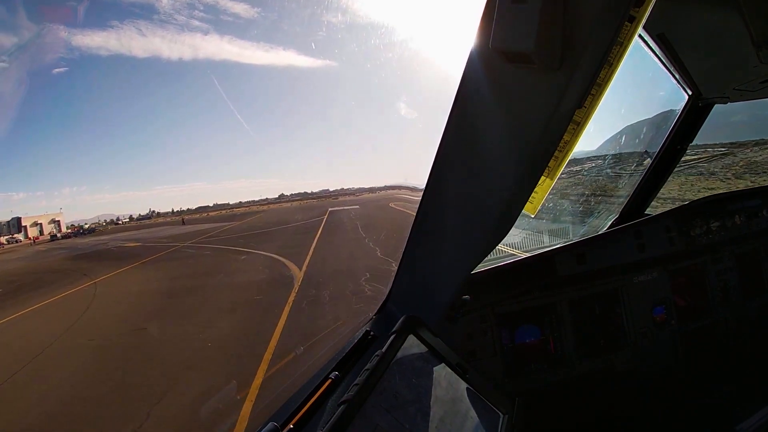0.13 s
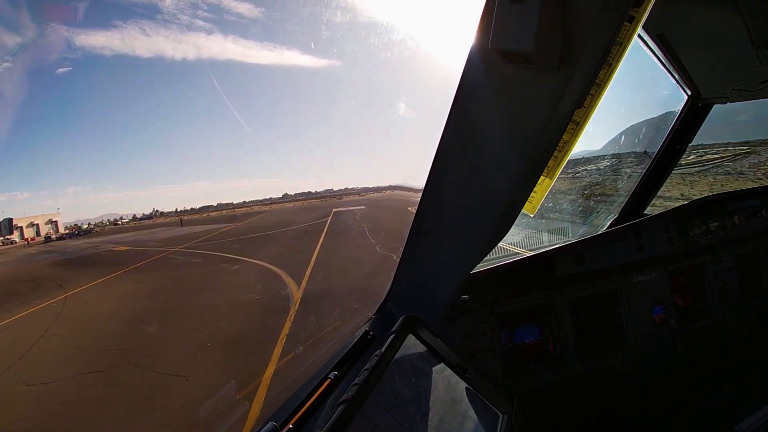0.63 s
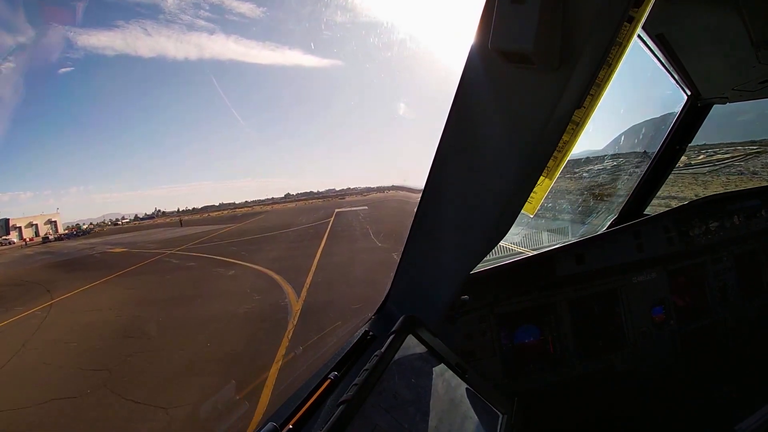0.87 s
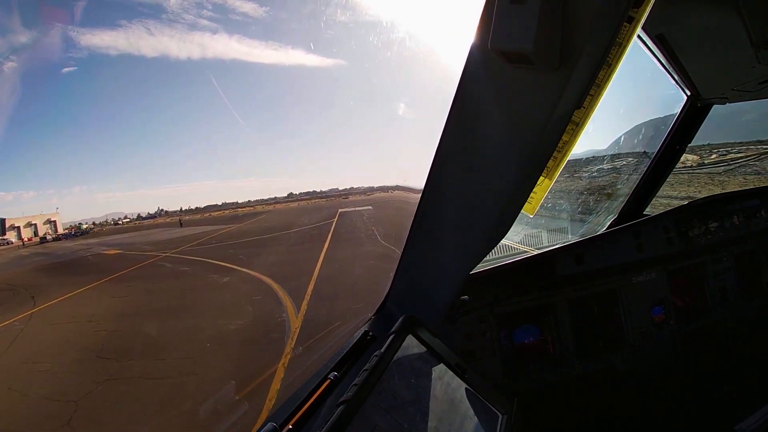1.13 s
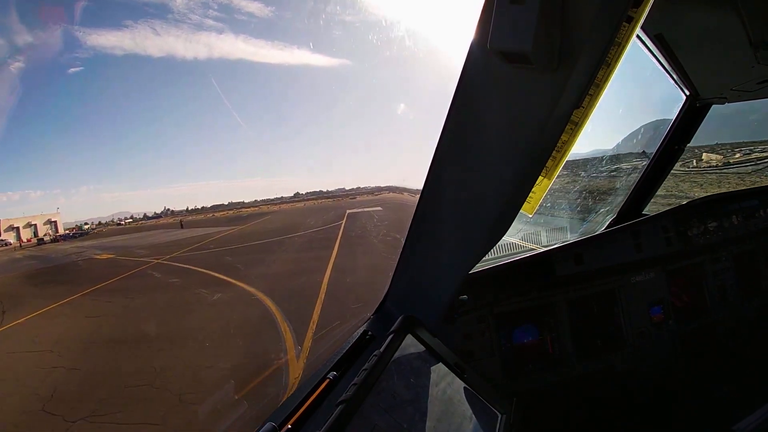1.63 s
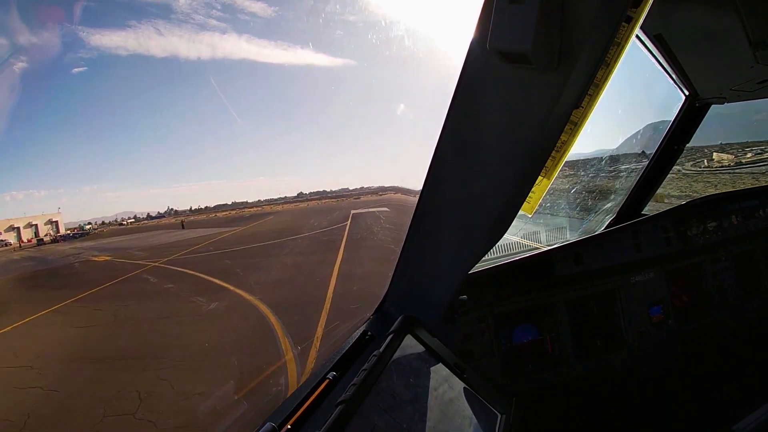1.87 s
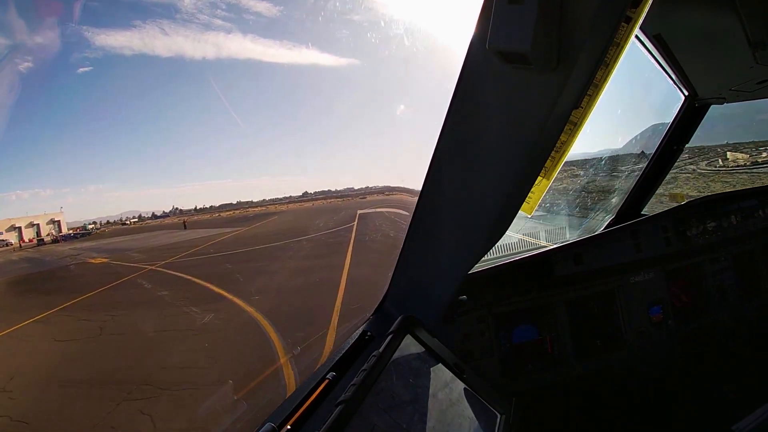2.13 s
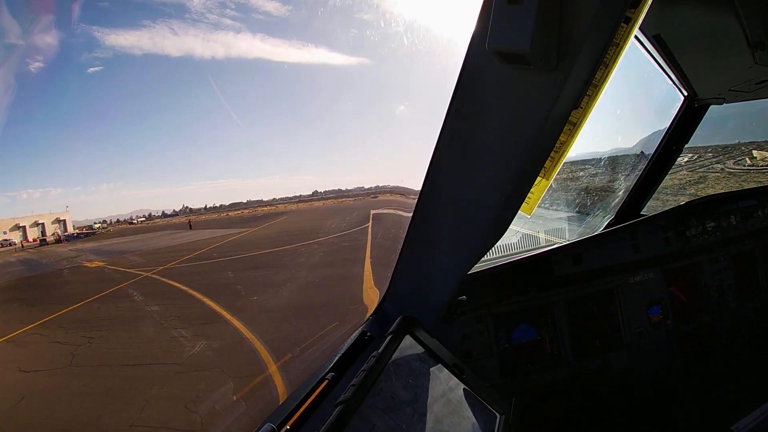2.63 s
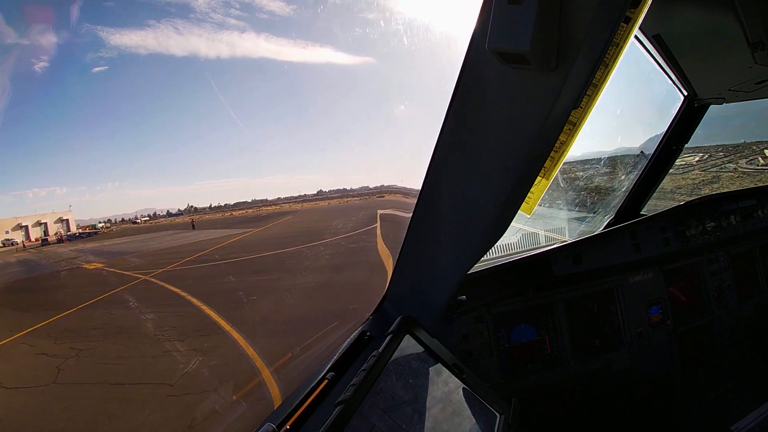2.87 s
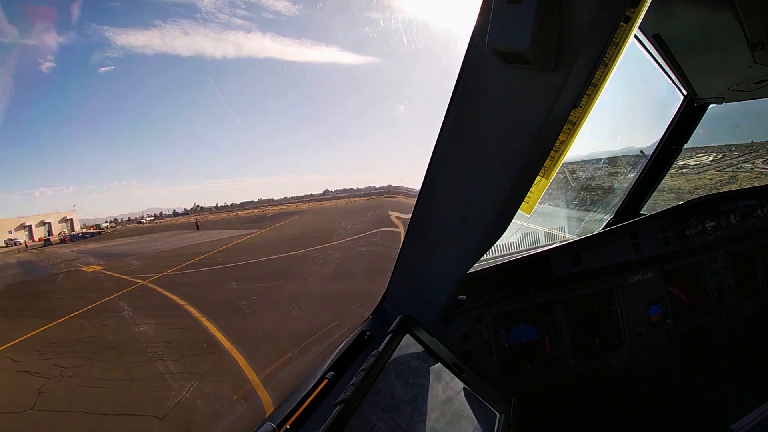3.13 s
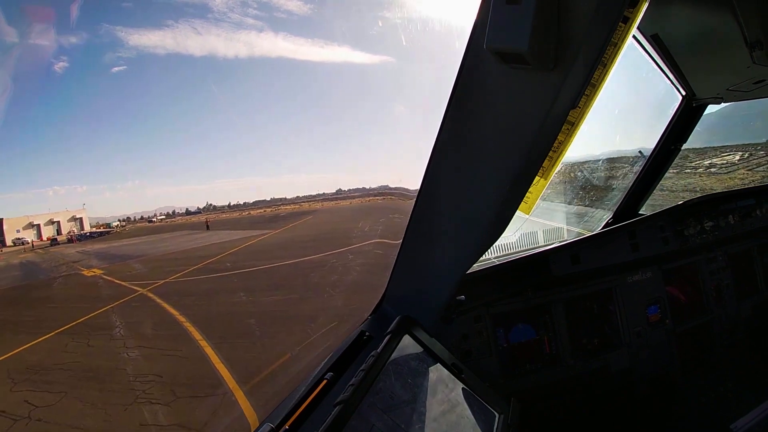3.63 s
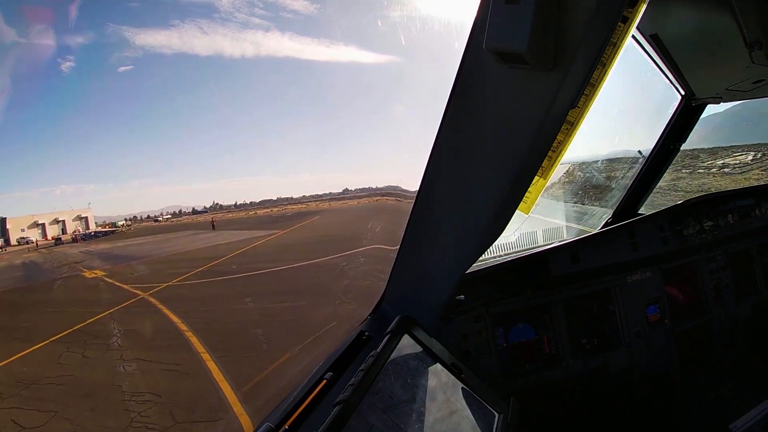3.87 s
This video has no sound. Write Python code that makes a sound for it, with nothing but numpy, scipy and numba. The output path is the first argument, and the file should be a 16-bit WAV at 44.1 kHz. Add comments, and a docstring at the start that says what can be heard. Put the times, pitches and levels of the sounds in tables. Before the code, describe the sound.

Deep wavering airframe rumble of a taxiing jet heard in its cockpit, with steady vent hiss

```python
"""Airframe boom fills a taxiing jet cockpit: engines and wheels shake it, heard as wavering sines over low noise.
Conditioned air rushes from the vents, as shaped noise through drifting cabin and duct resonances.
Loose trim rattles on bumps and small plastic parts tick, as short bursts of gritty noise.
Cooling fans and a turbine whine faintly, as sines with unsteady pitch and level. A limiter rides the bass peaks."""
import sys
import numpy as np
from scipy import signal
from scipy.fft import rfft, irfft, next_fast_len
from scipy.io import wavfile
from scipy.ndimage import uniform_filter1d, minimum_filter1d, map_coordinates
from numba import njit

SR = 44100
rng = np.random.default_rng(int(sys.argv[2]) if len(sys.argv) > 2 else 0)


def voltage_ratio(decibels):
    """Convert decibels (scalar or array-like) to amplitude ratios, 20 dB per decade."""
    exponent = np.asarray(decibels, float) / 20
    return 10 ** exponent


def bounce(signal):
    """Save signal as a 16-bit WAV file at the path given by the first command-line argument."""
    frames = np.transpose(np.atleast_2d(signal))
    limited = np.clip(frames, -1, 1)
    pcm = np.round(limited * 32767).astype(np.int16)
    wavfile.write(sys.argv[1], SR, pcm)


N = 176400  # samples

# Swelling of the five lowest airframe modes: [t/s, then level/dB of each mode]
MODE_LEVELS = [(0.05, -24, -23, -16, -28.5, -30), (0.21, -20, -17, -26, -30, -34),
               (0.34, -12, -12, -30.5, -40, -38), (0.43, -21, -17.5, -20, -27, -29.5),
               (0.75, -19.5, -18.5, -23, -26.5, -26.5), (0.97, -19, -22, -32, -27, -28.5),
               (1.18, -14, -25, -15.5, -24.5, -33), (1.28, -16, -17.5, -31, -31.5, -33.5),
               (1.85, -31, -22, -17.5, -49, -27), (1.96, -19.5, -31, -33, -38, -30.5),
               (2.01, -29, -14, -28, -28.5, -33), (2.15, -20.5, -32, -36.5, -39.5, -26.5),
               (2.52, -21, -33, -29, -38, -29.5), (2.63, -26, -33, -31, -30, -22.5),
               (2.69, -20, -21, -23, -51, -30), (3.25, -22, -31, -24.5, -26.5, -32.5),
               (3.31, -27, -28.5, -28, -27, -29.5), (3.62, -17.5, -21, -15.5, -31, -32),
               (3.68, -34, -19.5, -23.5, -39, -31.5), (4.0, -23, -24, -31.5, -27.5, -24.5)]
# The same modes: [f/Hz, pitch wander/Hz, wander rate/knots per s, churning share/0-1]
MODES = [(23.9, 1.144, 5, 0.15), (47.1, 4.55, 12, 0.45), (77, 5.91, 14, 0.41), (127.2, 4.8, 18, 0.44),
         (176.8, 8.98, 26, 0.35)]
# Rolling and engine rumble, relative spectrum: [f/Hz, level/dB]
RUMBLE_SPECTRUM = [(2.4, -15), (4.0, -16.5), (27, -4.5), (75, -4), (107, -5.5), (146, -9.5), (176, -9.5),
                   (212, -14), (246, -14), (330, -30), (430, -56), (730, -120)]
RUMBLE_DB = -21.5


def airframe():
    """Structural modes waver, each part steady and part churning, over a broad rumble."""
    booms = 0
    for level_db, (hz, wander_hz, rate, share) in zip(curves(MODE_LEVELS), MODES):
        churn = np.clip(share, 0, 1)
        # the churn swings through zero and moves faster than the pitch
        size = np.sqrt(1 - churn) + np.sqrt(churn) * unit(wobble(1.6 * rate))
        pitch = hz + wander_hz * wobble(rate)
        booms = booms + voltage_ratio(level_db) * size * tone(pitch)
    rumble = rush(lambda hz: voltage_ratio(along(RUMBLE_SPECTRUM, hz)), patchy_db=0.5)
    return booms + voltage_ratio(RUMBLE_DB) * rumble


# Course of the vent air before its flutter: [t/s, level/dB, treble gain/dB]
AIR_COURSE = [(0.05, -36.5, -0.5), (1.09, -36.5, 0), (1.9, -36.5, 0.5), (2.2, -35.5, 0), (2.66, -35, 0.5),
              (2.95, -36, -0.1), (3.38, -35.5, 0), (3.69, -36.5, 1.3), (4.0, -35, -0.5)]
# Body of the rush ahead of the resonances, relative spectrum: [f/Hz, level/dB]
VENT_SPECTRUM = [(160, -40), (280, -1), (364, -6.5), (641, -8), (785, -10.5), (844, -15), (990, -8.5),
                 (1340, -18.5), (1530, -20), (2200, -24.5), (3770, -23), (6440, -31), (9000, -32),
                 (11700, -67), (19800, -120)]
# Fizzy top of the rush, relative spectrum: [f/Hz, level/dB]
FIZZ_SPECTRUM = [(7000, -20), (8500, -20), (9300, 1), (9800, -6.5), (10150, -14), (10600, -9.5),
                 (11800, -10), (12400, -23), (13300, -21), (15500, -27), (16000, -28), (17000, -60)]
FIZZ_DB = -62.5  # base level, moved by the air course and flutter


def vents():
    """Turbulent air makes broad noise: a resonant body with fluttering treble, and a fizzy top."""
    level_db, bright_db = curves(AIR_COURSE)
    body = ducted(rush(lambda hz: voltage_ratio(along(VENT_SPECTRUM, hz)), patchy_db=0.5))
    upper = filtered(body, lambda hz: 1 / (1 + (2200 / (hz + 1)) ** 4))
    treble_db = bright_db + 0.32 * wobble(25.04)
    brightened = body + (voltage_ratio(treble_db) - 1) * upper
    body = voltage_ratio(level_db + 0.45 * wobble(6.66)) * brightened
    fizz = rush(lambda hz: voltage_ratio(along(FIZZ_SPECTRUM, hz)), patchy_db=0.8)
    return body + voltage_ratio(FIZZ_DB + level_db - level_db.mean() + treble_db) * fizz


# Cabin and duct resonances at rest, negative for dips: [f/Hz, width/Hz, boost/dB]
DUCT_RESONANCES = [(452, 34, 3), (638, 29, 6.5), (775, 21.3, 8.5), (1167, 34, 3.5), (1262, 21, 4.5),
                   (1510, 98, 7), (1916, 340, 5.5), (2273, 76, -5.5), (2346, 51, 7.5), (2490, 37, 4),
                   (3590, 79, 2), (3750, 73, -4.5), (3920, 100, -2.5), (5210, 120, 3.5)]
# wander as a share of pitch and of boost; its rate in knots per s
DRIFT, BREATHE, DRIFT_PER_S = .008, .22, 6


def ducted(x):
    """Cavities boost or dip narrow bands, each drifting in pitch and strength."""
    hz, t, z = signal.stft(x, SR, nperseg=4096, noverlap=3072)
    at = np.clip((t * SR).astype(int), 0, N - 1)
    boost_db = 0
    for centre, width, db in DUCT_RESONANCES:
        strength = db * (1 + BREATHE * wobble(DRIFT_PER_S)[at])
        pitch = centre * (1 + DRIFT * wobble(DRIFT_PER_S)[at])
        boost_db = boost_db + strength / (1 + (2 * (hz[:, None] - pitch) / width) ** 2)
    return unit(signal.istft(z * voltage_ratio(boost_db), SR, nperseg=4096, noverlap=3072)[1][:N])


# Trim rattles: [t/s, level/dB, length scale/s]
TRIM_RATTLES = [(.15, -54, .012), (0.298, -42.5, 0.022), (.91, -55, .015), (1.23, -47, 0.013),
                (1.74, -50, .015), (1.86, -47, .008), (2.63, -54, .01), (3.53, -53, .015)]
# Rattling trim, relative spectrum: [f/Hz, level/dB]
TRIM_SPECTRUM = [(800, -30), (2500, 1), (5000, -6), (9000, -8), (12000, -22), (15500, -30), (17000, -80)]
# Thin plastic ticks: [t/s, level/dB]
PLASTIC_TICKS = [(.355, -64), (.689, -63.5), (.956, -64), (1.145, -63.5), (1.194, -63), (1.226, -64.5),
                 (1.404, -67), (1.535, -65), (1.737, -63.5), (1.984, -66), (2.628, -62.5), (3.536, -65)]
# Ticking plastic, relative spectrum: [f/Hz, level/dB]
TICK_SPECTRUM = [(5000, -20), (8000, -2), (11000, 0), (15500, -8), (17000, -60)]
TICK_S = .007  # length scale
LOOSE_PER_S, LOOSE_DB = 8, -73  # average rate and middle level of faint random ticks


def rattles():
    """Loose trim chatters on bumps; small plastic parts tick at set and at random moments."""
    draw = rng.random((100, 2))
    times = np.cumsum(-np.log(draw[:, 0])) / LOOSE_PER_S
    levels_db = LOOSE_DB + 6 * (draw[:, 1] - .5)
    loose = [(s, db) for s, db in zip(times, levels_db) if s < N / SR]
    ticks = [(s, db, TICK_S) for s, db in list(PLASTIC_TICKS) + loose]
    return bursts(TRIM_RATTLES, TRIM_SPECTRUM) + bursts(ticks, TICK_SPECTRUM)


def bursts(rows, spectrum):
    """Impacts as gritty noise under quick swells: a fast rise, then a slower exponential decay."""
    t, swell = np.arange(N) / SR, np.zeros(N)
    for s, db, length in rows:
        a, b = max(int((s - .03) * SR), 0), int((s + .12) * SR)
        u = (t[a:b] - s) / length
        swell[a:b] += voltage_ratio(db) * np.exp(np.where(u < 0, 4 * u, -1.6 * u))
    # a random gain on every sample makes the noise spiky
    grit = rng.standard_normal(N) * voltage_ratio(4 * rng.standard_normal(N))
    return swell * unit(filtered(grit, lambda hz: voltage_ratio(along(spectrum, hz))))


# Centre pitches of the fan whines: [f/Hz]
FAN_HZ = [998, 2912, 5760, 5819]
# The same whines in order: [level/dB, pitch wander/Hz, level flutter/dB]
FAN_WHINES = [(-53.5, 4, 2.5), (-66.5, 1.2, 1), (-76, 1, 3), (-74, 1.2, 3.5)]
# Engine whistle before its flutter: [t/s, level/dB]
TURBINE_LEVEL = [(0.05, -71), (0.3, -66), (0.6, -68), (1.6, -64), (1.88, -60), (1.99, -65), (2.1, -58.5),
                 (2.59, -57.5), (2.88, -58), (3.05, -63), (3.7, -64), (3.95, -61)]
TURBINE_HZ = 3909  # centre pitch


def whines():
    """Rotating fans and turbine sing thin tones, unsteady in pitch and level."""
    fans = 0
    for hz, (level_db, wander_hz, flutter_db) in zip(FAN_HZ, FAN_WHINES):
        level = voltage_ratio(level_db + flutter_db * wobble(12))
        fans = fans + level * tone(hz + wander_hz * wobble(12))
    turbine_db, = curves(TURBINE_LEVEL)
    whistle = tone(TURBINE_HZ + 2.2 * wobble(14))
    return fans + voltage_ratio(turbine_db + 3.2 * wobble(29.8)) * whistle


def unit(x):
    """Scales a signal to rms 1."""
    return x / np.sqrt(np.mean(x ** 2) + 1e-20)


def along(points, hz):
    """Reads (f, value) points on a log frequency axis."""
    f, v = np.transpose(points)
    return np.interp(np.log(hz + 1), np.log(f + 1), v)


def curves(rows):
    """One value per sample for each column after the time."""
    s, *cols = np.transpose(rows)
    return [np.interp(np.arange(N) / SR, s, c) for c in cols]


def wobble(rate):
    """A smooth random curve around zero, rate in knots per s."""
    return map_coordinates(rng.standard_normal(400), [np.arange(N) * np.clip(rate, .1, 90) / SR])


def filtered(x, response):
    """Multiplies the spectrum of x by a response of frequency."""
    m = next_fast_len(N + 8192)
    return irfft(rfft(x, m) * response(np.fft.rfftfreq(m, 1 / SR)), m)[:N]


def rush(response, patchy_db):
    """Turbulence as noise of rms 1, with random gain in patches of time and frequency."""
    z = signal.stft(rng.standard_normal(N + 512), nperseg=512)[2]
    field = uniform_filter1d(rng.standard_normal(z.shape), size=8, axis=0)
    field = uniform_filter1d(field, size=10, axis=1)
    patchy = signal.istft(z * voltage_ratio(patchy_db * unit(field)), nperseg=512)[1][:N]
    return unit(filtered(patchy, response))


def tone(hz):
    """A sine of rms 1 on a pitch curve, from a random phase."""
    return np.sqrt(2) * np.sin(2 * np.pi * (np.cumsum(hz) / SR + rng.random()))


FADE_S = .008


def scene():
    """All sources together, with a brief soft ending."""
    mix = airframe() + vents() + rattles() + whines()
    left = np.clip((N - 1 - np.arange(N)) / (FADE_S * SR), 0, 1)
    return (mix * np.sin(np.pi / 2 * left) ** 2)[None]


@njit
def riding(need, recover):
    """Gain that drops at once and climbs back slowly."""
    gain, g = np.empty_like(need), need[0]
    for i in range(len(need)):
        g = min(need[i], 1 - (1 - g) * recover)
        gain[i] = g
    return gain


BASS_HZ, CEILING = 260, .31  # top of the limited band; bass amplitude that triggers it
ATTACK_S, RELEASE_S = .008, .06


def bass_limiter(dry):
    """Looks ahead and turns down only the bass at its peaks, leaving the rest untouched."""
    bass = filtered(dry[0], lambda hz: 1 / (1 + (hz / BASS_HZ) ** 6))
    ahead = int(ATTACK_S * SR)
    need = minimum_filter1d(np.minimum(1, CEILING / (abs(bass) + 1e-9)), 2 * ahead + 1)
    gain = uniform_filter1d(riding(need, np.exp(-1 / (RELEASE_S * SR))), ahead)
    return dry + (gain - 1) * bass


def band_limit(x):
    """A steep low-pass at the top of the band."""
    return signal.sosfilt(signal.butter(12, 15760, fs=SR, output="sos"), x)


def record(dry):
    """Holds down the bass peaks and delivers the finished mix."""
    mix = bass_limiter(dry)
    return band_limit(mix)


dry = scene()
out = record(dry)
bounce(out)
```